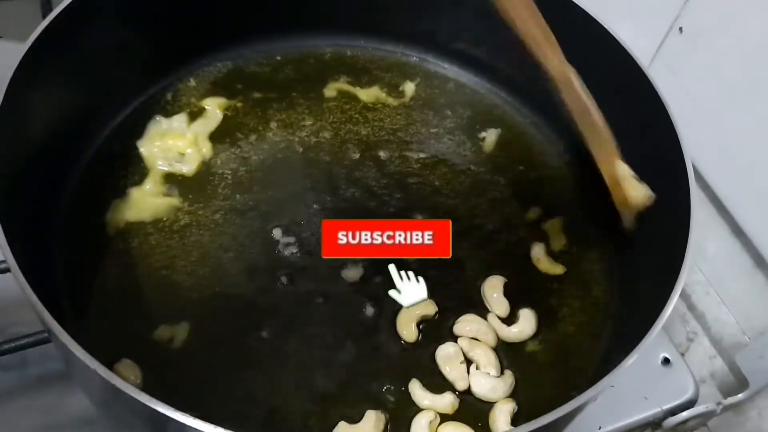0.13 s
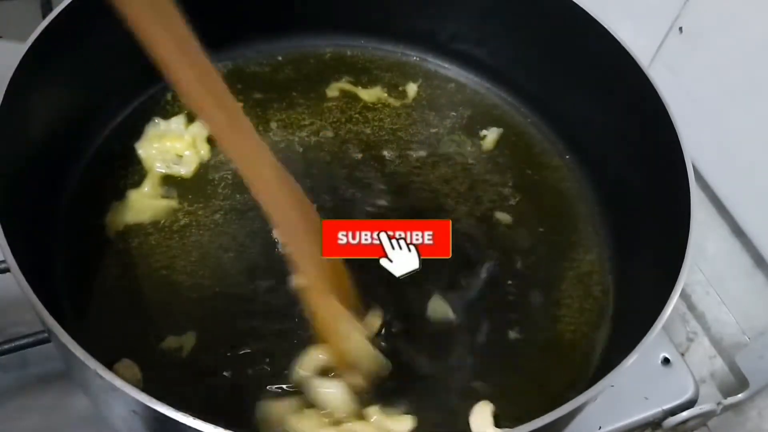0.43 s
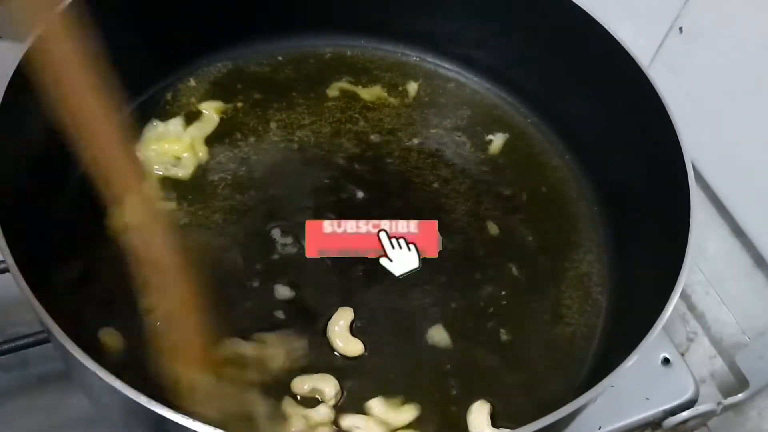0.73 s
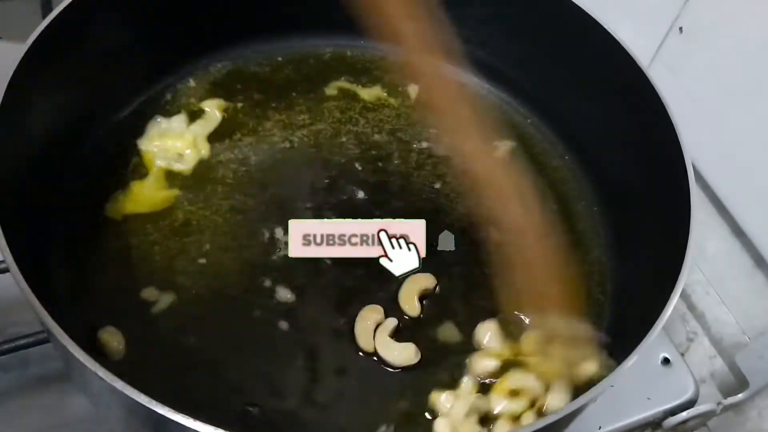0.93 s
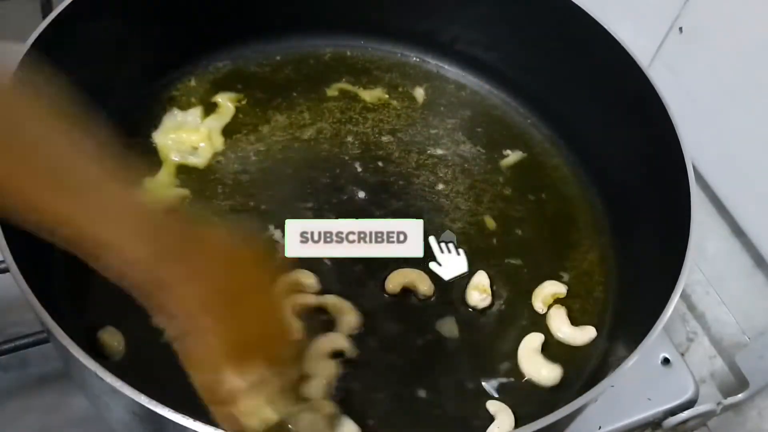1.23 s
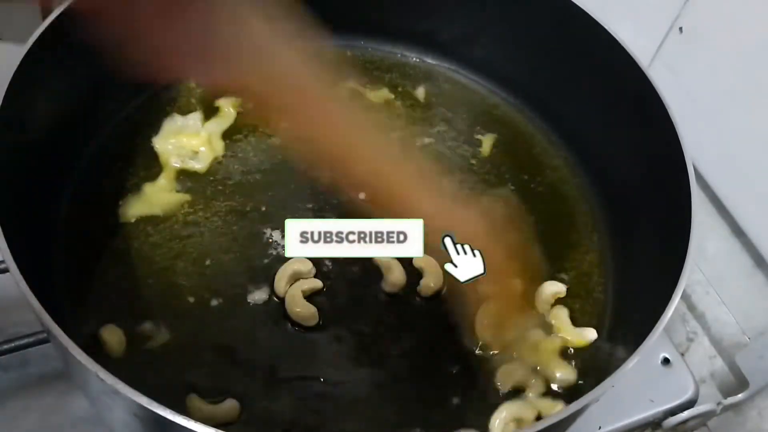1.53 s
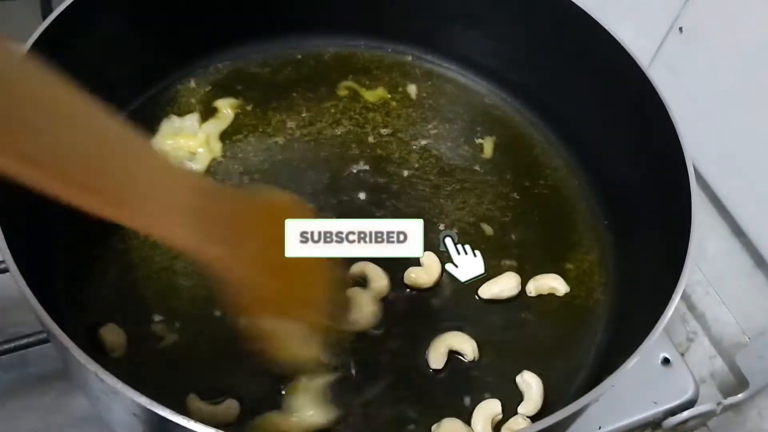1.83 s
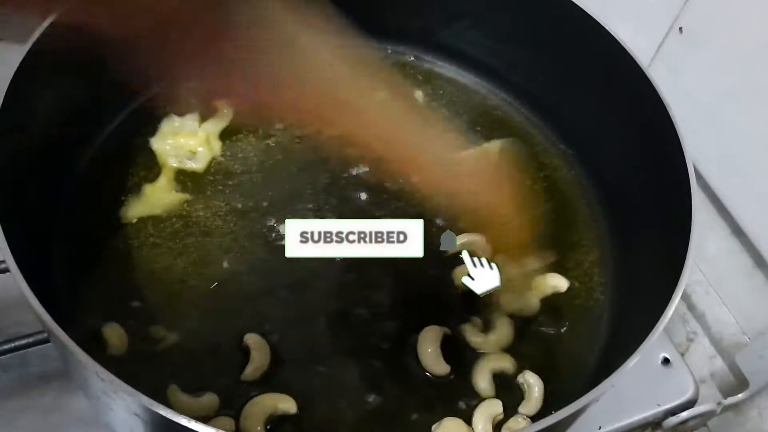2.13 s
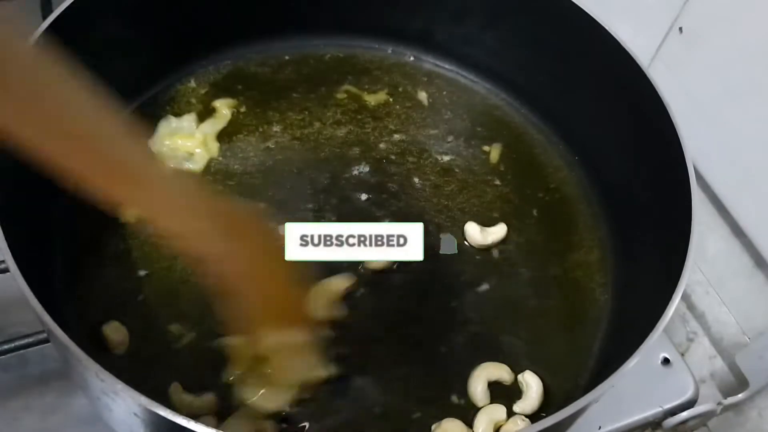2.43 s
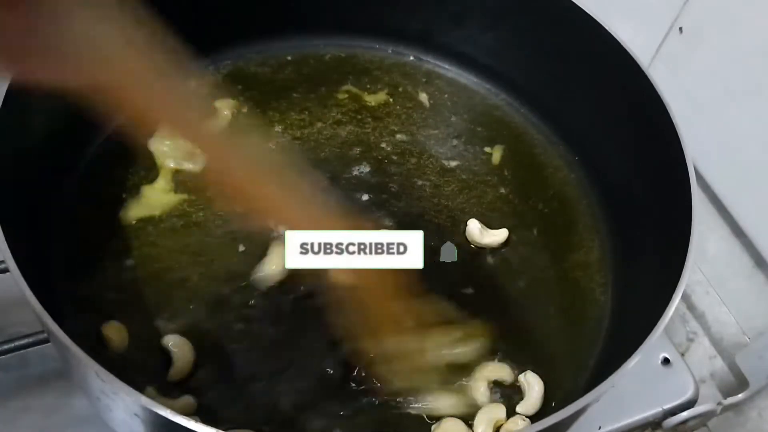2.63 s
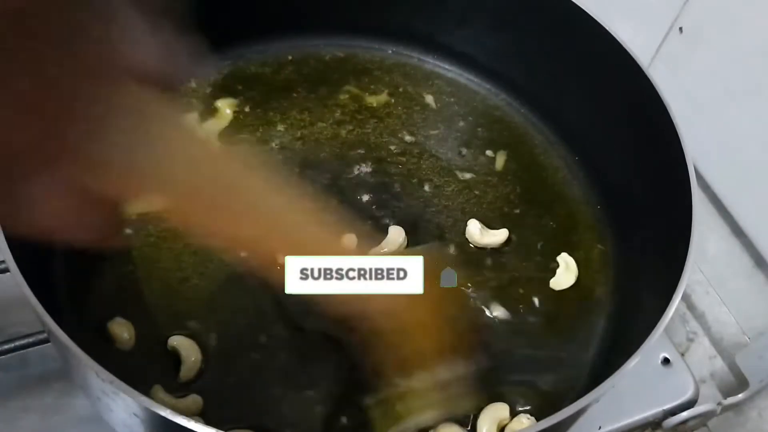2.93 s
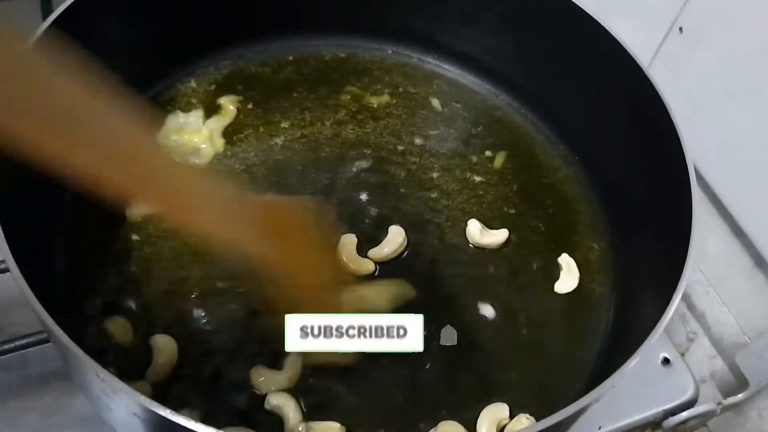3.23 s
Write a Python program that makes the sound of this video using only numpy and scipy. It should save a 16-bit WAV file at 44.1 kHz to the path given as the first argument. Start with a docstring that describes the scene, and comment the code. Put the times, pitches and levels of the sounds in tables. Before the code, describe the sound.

A wooden spatula knocks on a metal pot while stirring nuts in fat, light taps first, then stronger hollow thumps, with short scrapes between; close microphone, small tiled kitchen, quiet background air.

```python
"""A wooden spatula stirring cashews in hot fat knocks on the pot: each knock is a noise burst of wood
on metal, shaped in five bands, with swelling hollow tones of the pot bottom.
Between knocks the blade and nuts scrape, as coloured random clicks; fat crackles and spits, nuts tick.
The pot's walls and modes and a tiled kitchen answer by convolution; behind lie a soft low boom of
the pot on the stove and steady background air, both filtered noise."""
import sys
import numpy as np
from scipy import signal
from scipy.fft import rfft, irfft
from scipy.io import wavfile
from scipy.ndimage import uniform_filter1d

SR = 44100
rng = np.random.default_rng(int(sys.argv[2]) if len(sys.argv) > 2 else 0)


def inscribe(sig):
    """Save sig as 16-bit PCM at rate SR to the path in sys.argv[1].

    A 1-D sig is mono; a 2-D sig holds one channel per row.
    Samples are clipped to [-1, 1] before scaling.
    """
    pcm = np.round(np.clip(np.atleast_2d(sig).T, -1, 1) * 32767)
    wavfile.write(sys.argv[1], SR, pcm.astype(np.int16))


N = 149940
T = np.arange(N) / SR  # time [s]


# Knocks of the spatula on the pot; levels are relative, before the common offsets below:
# (start [s], contact [s], level in each of five bands [dB], hollow tone [Hz], hollow tone level [dB],
#  after-ring [dB], left over right [dB])
KNOCKS = [ (.167, 0.0075, -45, -41, -41.5, -43.5, -62, 830, -47, 4.5, 4),
          (0.2628, 0.0016, -23.5, -25, -19, -26.5, -47.5, 417, -24, -0.5, 1),
          (.373, 0.017, -41, -26, -30, -37.5, -48, 575, -31, -2.5, 4),
          (.394, 0.0048, -61, -41, -34, -45, -34, 1200, -39, -2.5, 0),
          (0.643, 0.0057, -37, -26.5, -25.5, -40, -45.5, 1194, -25, 7.5, 5),
          (.782, 0.02, -22.5, -16.5, -27, -43.5, -65, 567, -20, -2.5, -2),
          (1.0068, 0.0052, -32, -24, -25, -22, -33.5, 567, -25.5, 0.5, 0),
          (1.0969, 0.0042, -21.5, -19.5, -15.5, -30, -44.5, 405, -45, -1, 2),
          (1.299, 0.013, -26.5, -28, -38.5, -48.5, -51.5, 575, -32, 11, -4),
          (1.396, 0.0034, -36, -31, -33.5, -34.5, -47, 1130, -27.5, 13, 10),
          (1.4112, 0.0164, -14.5, -9, -12, -20, -28, 608, -9, -1.5, 3.5),
          (1.659, 0.0038, -49, -46, -36, -45, -89, 598, -39, 2.5, 3),
          (1.704, 0.0099, -32, -36.5, -36, -48, -78, 467, -27.5, 2.5, .5),
          (1.863, .005, -61, -46, -82, -50.5, -46, 586, -53, -2, -2),
          (1.979, .015, -15, -10, -12.5, -17.5, -20.5, 501, -6, 0.5, 0.5),
          (2.289, 0.0034, -21, -20, -15.5, -25.5, -39.5, 578, -32, 0.5, 0),
          (2.545, 0.0095, -32, -25.5, -27.5, -37.5, -46.5, 578, -35, 4.5, -2),
          (2.6128, 0.017, -22, -12, -11.5, -17.5, -24.5, 488, -9.5, 0, 1),
          (2.864, 0.005, -44, -36, -35.5, -37, -53, 2200, -35, 2.5, 1),
          (2.893, 0.0046, -19.5, -18.5, -19.5, -38, -52, 585, -18.5, 0, 2),
          (3.133, 0.0061, -38, -39.5, -45, -55.5, -63, 596, -60, 11, 1.5),
          (3.168, 0.016, -20.5, -15, -12, -22.5, -27.5, 508, -21, 0.5, 0.5)]
# Centres of the five knock bands: (frequency [Hz])
KNOCK_BANDS_HZ = [250, 600, 1600, 4800, 11500]
# Spectrum common to all blows: (frequency [Hz], gain [dB])
BLOW_COLOUR = [(40, -53), (100, -20.5), (180, -5), (260, -1.5), (350, 3.5), (500, 3), (800, -5), (1200, -1),
               (1800, -3.5), (2700, -13.5), (3600, -20.5), (5000, -22.5), (6300, -22.5), (7000, -29.5),
               (8000, -27), (9500, -36.5), (15500, -39)]
KNOCK_DB, TONE_DB = -6.5, -5  # offsets of the bands and of the hollow tone
TONE_PUSH_DB = -8  # how strongly the tones drive the after-ring
THUD_HZ, THUD_DB = 274.1, -7.5  # lowest hollow tone of the pot, against the lowest knock band
TREBLE_FADE = 0.43  # strength of the treble's extra decay during contact
RELEASE_S = 0.0014  # time constant as the blade lets go


def knocks(size=8192):
    """Contact excitation: wood chatters on metal, giving direct sound and a push on the after-ring."""
    direct, push = np.zeros((2, N)), np.zeros(N)
    t = T[:size]
    blow_db = curve_db(BLOW_COLOUR, size)
    shapes = bands(KNOCK_BANDS_HZ, size)
    for start, contact, *levels, tone_hz, tone_db, ring_db, pan_db in KNOCKS:
        release = np.maximum(t - contact, 0) / RELEASE_S
        burst = chatter(np.exp(-release - t / contact / 2))
        tone = sized(hollow_tone(tone_hz, contact, t), tone_db + TONE_DB)
        thud = sized(hollow_tone(THUD_HZ, contact, t), levels[0] + THUD_DB)
        tones = tone + thud
        blow = amp(blow_db + spot_colour(size))
        knock = 0
        for centre, shape, level in zip(KNOCK_BANDS_HZ, shapes, levels):
            # higher bands fade faster
            fade = np.exp(-TREBLE_FADE * centre / (centre + 2000) * t / contact)
            knock = knock + sized(causal(burst * fade, blow * shape), level + KNOCK_DB)
        add(direct, start, (knock + tones) * amp([[pan_db / 2], [-pan_db / 2]]))
        add(push, start, (knock + amp(TONE_PUSH_DB) * tones) * amp(ring_db))
    return direct, push


def hollow_tone(hz, contact, t, release_s=0.0061):
    """Forced vibration: the pot bottom swings while the blade presses on it and stops soon after."""
    swell = np.sqrt(np.minimum(t / contact, 1))
    release = np.exp(-np.maximum(t - contact, 0) / release_s)
    return swell * release * np.sin(2 * np.pi * hz * t)


def spot_colour(size, spread_db=4):
    """Modal coupling: each blow meets the pot at another spot, which favours other resonances."""
    hz = np.fft.rfftfreq(size, 1 / SR)
    knots = np.arange(0, SR / 2, 220)  # random gain every 220 Hz
    return spread_db * np.interp(hz, knots, rng.standard_normal(len(knots)))


# Strokes of the blade over the bottom:
# (start [s], end [s], rumble level [dB], grit level [dB], hiss level [dB])
SCRAPES = [(0.178, 0.234, -42, -55, -72), (0.288, 0.373, -38, -42, -59), (0.38, 0.474, -49.5, -56, -53.5),
           (0.68, 0.796, -38.5, -52.5, -57), (0.748, 0.853, -43, -43, -57),
           (0.998, 1.111, -36.5, -44.5, -73), (1.115, 1.277, -45, -74, -59), (1.557, 1.72, -44.5, -71, -83),
           (1.676, 1.885, -49, -60, -73), (2.323, 2.514, -48, -64, -65), (2.646, 2.825, -43.5, -71, -57),
           (2.918, 3.026, -38, -47.5, -56.5), (3.04, 3.127, -52, -61.5, -62.5),
           (3.269, 3.41, -41.5, -46, -48.5)]
# Spectra of the three parts of a scrape, low to high: (frequency [Hz], relative gain [dB])
RUMBLE = [(60, -50), (130, 3), (200, 9.5), (550, 1), (900, -31), (2000, -51), (8000, -60)]
GRIT = [(200, -24), (700, 4.5), (1500, 5.5), (2400, 9.5), (3300, 0), (5000, -8), (15000, -22)]
HISS = [(800, -52), (2300, -30), (3200, 4), (4500, 0.5), (7500, -0.5), (9500, -6.5), (15500, -4.5)]


def scrapes(grains_per_s=820, spread_db=3):
    """Stick-slip friction: blade and nuts catch and slip as random clicks; strokes swell and fade."""
    out, lumps = np.zeros(N), tumble()
    for k, spectrum in enumerate([RUMBLE, GRIT, HISS]):
        pressure = np.zeros(N)
        for start, end, *levels in SCRAPES:
            progress = np.clip((T - start) / (end - start), 0, 1)
            pressure += amp(levels[k]) * np.sin(np.pi * progress)
        friction = unit(colour(grains(grains_per_s, spread_db), spectrum))
        out += pressure * lumps * friction
    return out


def tumble(unevenness_db=2):
    """Amplitude modulation: nuts catch and roll free, so scraping comes in small lumps."""
    knots = np.arange(0, N / SR + 1, .009)  # new random level every 9 ms
    lump = np.interp(T, knots, rng.uniform(-0.28, 1, len(knots)))
    return unit(amp(unevenness_db * lump))


# Spits of fat and small ticks of nuts: (time [s], centre frequency [Hz], level [dB])
SPITS_AND_TICKS = [(0.094, 6300, -55), (.187, 4860, -54.5), (.442, 7060, -51), (0.694, 6300, -50.5),
                   (1.186, 9100, -60.5), (1.253, 7300, -51.5), (1.295, 9600, -57.5), (2.975, 9700, -58),
                   (3.047, 3700, -57), (3.301, 2870, -40.5), (3.332, 3280, -41.5)]
# Spectrum of the faint crackle: (frequency [Hz], relative gain [dB])
SIZZLE = [(1000, -2), (3000, -6.5), (7000, -1.5), (9500, -13.5), (15500, -10.5)]
SIZZLE_PER_S, SIZZLE_SPREAD_DB, SIZZLE_DB = 220, 1, -71
POP_T60_S = 0.029  # 60 dB decay of the envelope given to the chatter
POP_OCTAVES = 0.41  # distance from the centre at which the gain is a quarter


def fat_and_ticks(size=2048):
    """Impulsive noise: sparse random clicks crackle faintly, and band-shaped bursts spit and tick."""
    out = amp(SIZZLE_DB) * unit(colour(grains(SIZZLE_PER_S, SIZZLE_SPREAD_DB), SIZZLE))
    for start, hz, db in SPITS_AND_TICKS:
        pop = chatter(decay(POP_T60_S)[:size])
        add(out, start, sized(causal(pop, bump(hz, POP_OCTAVES, size) ** 2), db))
    return out


# Stereo width of the wall reflections: (frequency [Hz], side against mid before the low cut [dB])
WALL_SIDE = [(200, -10), (1200, 1)]
WALL_LOW_HZ = 920  # the pot is too small to reflect long waves
WALL_DB, WALL_T60_S = -2, 0.029  # T60 is of the envelope given to the chatter


def pot_walls():
    """Early reflection: dense, quick echoes inside the pot, different for each side."""
    onset = 1 - decay(0.0025)
    mid = chatter(decay(WALL_T60_S)) * onset
    side = chatter(decay(WALL_T60_S)) * onset
    low_cut = signal.butter(2, WALL_LOW_HZ, "high", fs=SR, output="sos")
    mid = signal.sosfilt(low_cut, mid)
    side = causal(side, amp(curve_db(WALL_SIDE, SR)))
    return amp(WALL_DB) * np.array([mid + side, mid - side]) / np.sqrt(np.sum(mid ** 2))


# Modes of the pot: (frequency [Hz], relative level before the frequency weighting [dB], T60 [s])
POT = [(192.4, 1, 0.56), (265.1, 1.5, 0.46), (407, -1.5, 0.36), (499.3, -9, 0.45), (587, -4, 0.27),
       (710, 0, 0.18), (789, -7, 0.61), (1122, -8.5, 0.36), (1225, -10.5, 0.17), (1454, -11, 0.3),
       (1810, -11, 0.18), (2142, -22, 0.72), (2342, -3.5, 0.15)]
# Reverberation of the kitchen by band: (centre frequency [Hz], relative level [dB], T60 [s])
ROOM = [(123, 12, 0.22), (290, 2.5, .55), (675, 3, 0.5), (1670, -3, 0.44), (4300, 0, 0.42),
        (12200, -2, 0.33)]
# Stereo width of the reverberation: (frequency [Hz], side against mid [dB])
ROOM_SIDE = [(100, -25), (300, -5.5), (900, -1)]
POT_DB = -20  # offset of all the modes


def after_ring():
    """Modal decay and reverberation: the modes of the pot and the tail of the tiled kitchen."""
    out = np.zeros((2, SR))
    for hz, db, t60 in POT:
        # random phase per side, nearly alike at low frequencies
        phase = rng.uniform(-1.1, 1, (2, 1)) * min(hz / 1000, 1)
        mode = np.sin(2 * np.pi * hz * T[:SR] + phase) * decay(t60)
        out += amp(POT_DB + db) * np.sqrt(hz / 500) * unit(mode)
    mid, side = rng.standard_normal((2, SR))
    air = rfft(unit(mid + colour(side, ROOM_SIDE) * np.array([[1], [-1]])))
    for (hz, db, t60), shape in zip(ROOM, bands([row[0] for row in ROOM], SR)):
        build_and_fade = unit(decay(t60) * (1 - decay(0.01)))
        out += amp(db) * irfft(air * shape, SR) * build_and_fade
    return out / np.sqrt(SR)


# Spectrum of the boom: (frequency [Hz], relative gain [dB])
BOOM = [(30, -43.5), (55, -28), (68, -11.5), (77, 3.5), (88, -10.5), (120, -16), (500, -60)]
# Course of the boom's loudness: (time [s], level [dB])
BOOM_LEVEL = [(0, -41.5), (.1, -64), (.55, -53), (.75, -57), (.86, -39), (1.0, -58), (1.14, -38.5),
              (1.32, -53), (1.47, -29.5), (1.64, -41.5), (1.8, -39), (1.93, -51), (2.03, -43.5), (2.5, -51),
              (2.8, -55), (2.92, -40), (3.08, -49.5), (3.4, -43)]


def boom():
    """Low-frequency resonance: the pot rocks on the stove, heard as narrow noise that swells and sinks."""
    x = signal.hilbert(colour(rng.standard_normal(N), BOOM))
    power = uniform_filter1d(abs(x) ** 2, size=4000)  # running mean over about 90 ms
    even = unit(x.real / np.sqrt(power))
    return even * amp(np.interp(T, *np.array(BOOM_LEVEL).T))


# Spectrum of the background air: (frequency [Hz], relative gain [dB])
KITCHEN = [(25, -17), (130, -1.5), (500, -10.5), (1500, -27), (4000, -48), (15500, -40)]


def kitchen(level_db=-54):
    """Partly correlated noise: steady, quiet air, with one share common to both sides."""
    common, separate = rng.standard_normal(N), rng.standard_normal((2, N))
    return amp(level_db) * unit(colour(common + 1.25 * separate, KITCHEN))


def amp(db):
    """Logarithmic level: decibels to amplitude gain."""
    return 10 ** (np.asarray(db) / 20)


def unit(x):
    """Normalisation of power: scale to an rms of one."""
    return x / np.sqrt(np.mean(x ** 2))


def sized(x, db):
    """Normalisation of energy: that of a hundredth of a second at this rms level."""
    return x * amp(db) * np.sqrt(SR / 100 / np.sum(x ** 2))


def log_hz(size):
    """Logarithmic pitch scale: octave position of each spectral bin."""
    return np.log2(np.maximum(np.fft.rfftfreq(size, 1 / SR), 1))


def curve_db(points, size):
    """Interpolation in octaves: (frequency [Hz], gain [dB]) points to a gain in dB per bin."""
    hz, db = np.array(points).T
    return np.interp(log_hz(size), np.log2(hz), db)


def colour(x, points):
    """Zero-phase filtering by a curve of (frequency [Hz], gain [dB]) points."""
    size = x.shape[-1]
    return irfft(rfft(x) * amp(curve_db(points, size)), size)


def causal(x, gain):
    """Minimum-phase filtering by a gain per bin, with nothing ahead of the attack."""
    cepstrum = irfft(np.log(np.maximum(gain, 1e-4)))
    # fold the negative times onto the positive ones
    cepstrum[1:len(cepstrum) // 2] *= 2
    cepstrum[len(cepstrum) // 2 + 1:] = 0
    return irfft(rfft(x) * np.exp(rfft(cepstrum)))


def bands(centres, size):
    """Complementary filtering: overlapping band shapes that add up to one."""
    octaves = log_hz(size)
    ramps = [np.interp(octaves, np.log2(centres), row) for row in np.eye(len(centres))]
    return [np.sin(np.pi / 2 * ramp) ** 2 for ramp in ramps]


def bump(hz, octaves, size):
    """Resonance curve: a bell around one frequency, halved at this distance in octaves."""
    return 1 / (1 + ((log_hz(size) - np.log2(hz)) / octaves) ** 2)


def chatter(envelope, count=6):
    """Spectral whitening: a noise burst alternately flattened in spectrum and shaped in time."""
    x = rng.standard_normal(len(envelope)) * envelope
    for _ in range(count):
        flat = irfft(np.exp(1j * np.angle(rfft(x))))
        x = flat * np.sqrt(envelope)
    return x


def grains(per_s, spread_db):
    """Poisson-like impulse noise: random clicks, many small and a few large."""
    size = amp(spread_db * np.minimum(rng.exponential(size=N), 5))
    sign = rng.choice([-1, 1], N)
    return size * sign * (rng.random(N) < per_s / SR)


def decay(t60):
    """Exponential decay: one second of amplitude falling 60 dB in t60 seconds."""
    return np.exp(-np.log(1000) * T[:SR] / t60)


def add(out, start, x):
    """Superposition: mix a sound in at a time in seconds."""
    i = max(int(start * SR), 0)
    out[..., i:i + x.shape[-1]] += x[..., :N - i]


STIRRING_RING_DB = -4  # how strongly the scrapes, fat and nut ticks drive the after-ring


def scene():
    """Convolution and superposition: sources sound in the pot, and the pot in the kitchen."""
    direct, push = knocks()
    stirring = scrapes() + fat_and_ticks()
    near = direct + stirring
    walls = signal.fftconvolve(near, pot_walls(), axes=1)[:, :N]
    drive = push + amp(STIRRING_RING_DB) * stirring
    ring = signal.fftconvolve(drive[None], after_ring(), axes=1)[:, :N]
    return near + walls + ring + boom() + kitchen()


def record(dry, top_hz=15900):
    """Saturation and band limiting: tanh rounds the highest peaks and a steep low-pass cuts the top."""
    rounded = 1.05 * np.tanh(dry / 1.05)
    low_pass = signal.ellip(10, .2, 80, top_hz, fs=SR, output="sos")
    return signal.sosfilt(low_pass, rounded)


dry = scene()
out = record(dry)
inscribe(out)
```